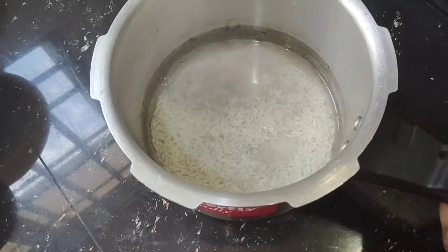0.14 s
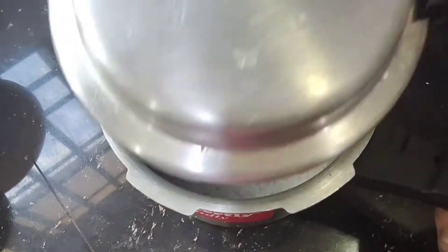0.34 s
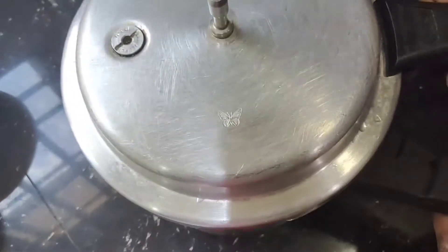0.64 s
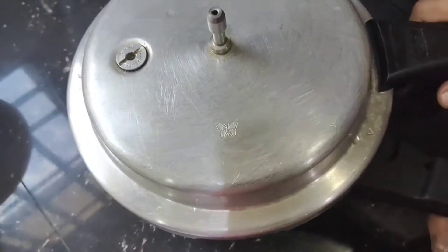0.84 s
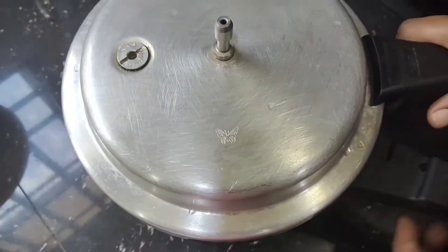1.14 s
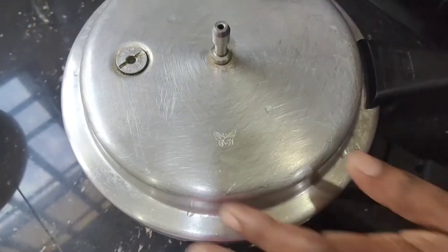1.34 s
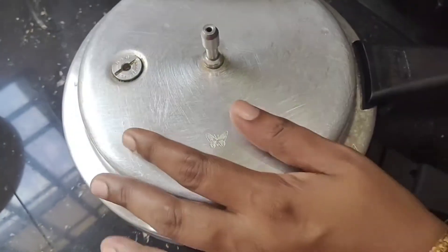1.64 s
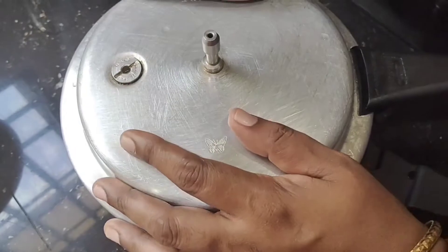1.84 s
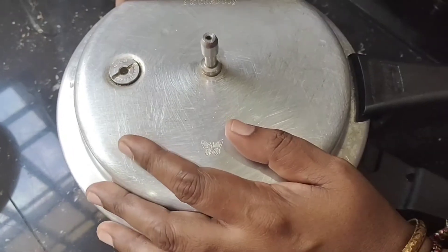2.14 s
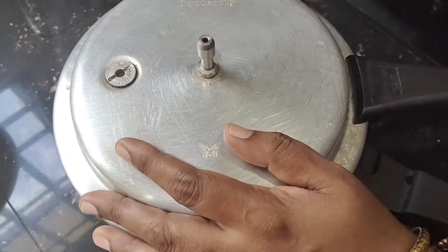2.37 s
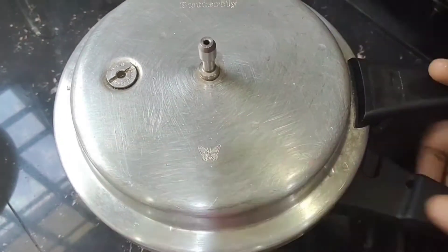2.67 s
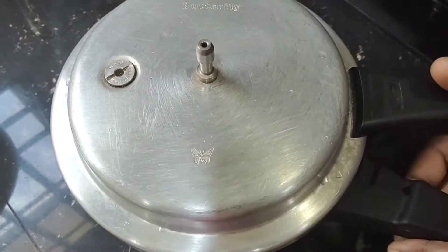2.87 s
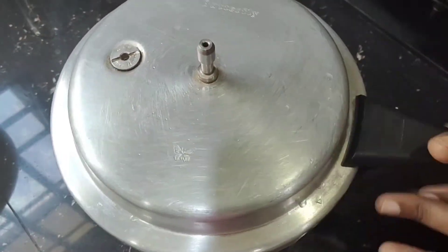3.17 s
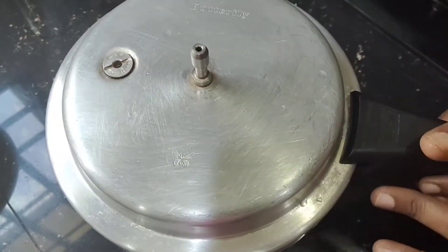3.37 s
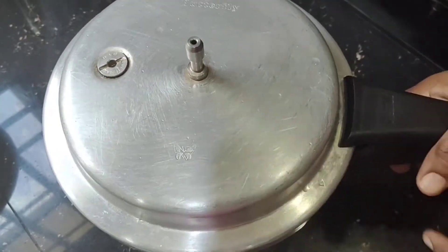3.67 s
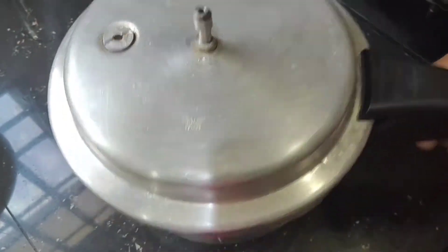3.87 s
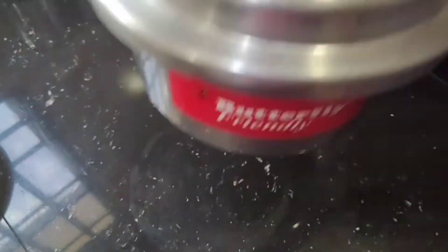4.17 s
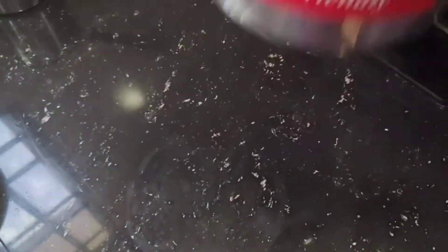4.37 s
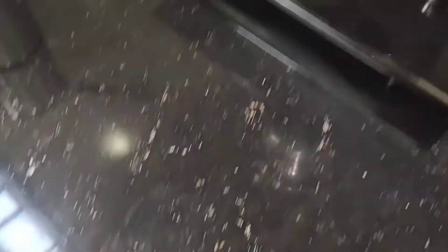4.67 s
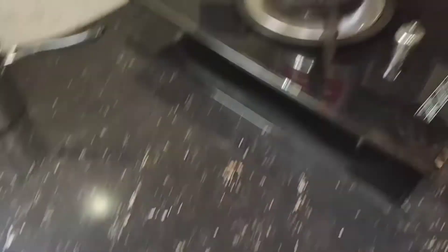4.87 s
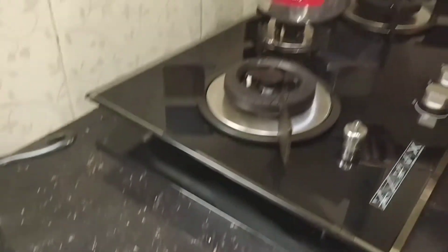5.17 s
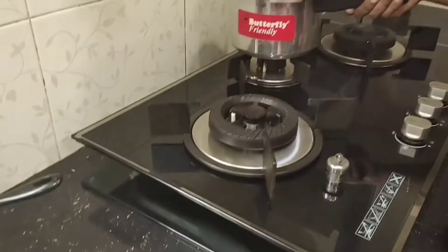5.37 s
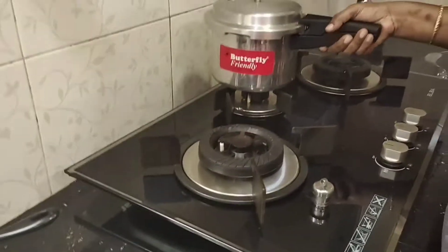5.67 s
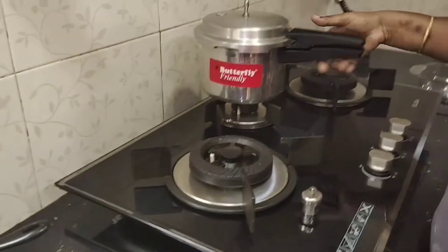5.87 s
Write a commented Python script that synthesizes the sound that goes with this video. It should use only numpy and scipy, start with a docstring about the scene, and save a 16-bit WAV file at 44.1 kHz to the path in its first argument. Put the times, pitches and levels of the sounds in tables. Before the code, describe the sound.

A nearby phone microphone catches a thin metal lid bouncing onto a cooker rim, sliding into its seat, being pushed down and turned until it snaps shut. The loudest clacks come halfway through. Then only faint handling and dry ticks, before the pot scrapes onto the metal grate, which sings briefly, and nudges it once more. Faint fluttering hum, slight hiss and short hard-tiled room reflections.

```python
"""An aluminium pressure cooker on a stone counter: its lid drops on the rim, is pressed home and twisted until
the handles lock, then the pot is lifted and set on a stove trivet. Contacts sum damped modes, noise and a thud;
sliding is grainy noise through the same modes, and a struck grate sings as a narrow band of noise. Behind them a low
hum throbs in the tiled kitchen, over faint sines, thin noise bands and dry ticks. A phone's left microphone port
rings near 2.5 kHz."""
import sys
import numpy as np
from scipy import signal
from scipy.fft import rfft, irfft, next_fast_len
from scipy.io import wavfile
from scipy.ndimage import uniform_filter1d, map_coordinates

SR = 44100
rng = np.random.default_rng(int(sys.argv[2]) if len(sys.argv) > 2 else 0)


def unload_audio(sound):
    """Save the sound as a 16-bit wav file, at the path given as the first command line argument."""
    columns = np.transpose(np.atleast_2d(sound))
    # keep every value between -1 and 1, then stretch to whole-number steps
    steps = np.round(np.clip(columns, -1, 1) * 32767)
    wavfile.write(sys.argv[1], SR, steps.astype(np.int16))


N = 265482  # samples

# Levels in the tables are relative: fixed trims in the functions are added to some of them.
# The throbbing hum. Each row: time in seconds, level in dB.
HUM_LEVEL = [(0, -67), (0.422, -60.5), (.72, -68), (1.5, -59.5), (1.95, -51), (2.33, -59), (2.529, -90),
             (2.798, -62), (3.6, -56.5), (3.96, -53), (4.301, -58), (4.628, -67), (4.73, -58.5),
             (5.02, -65.5), (5.3, -66), (6.02, -60.5)]
# The drone above the hum. Each row: time in seconds, level in dB.
DRONE_LEVEL = [(0, -78), (.6, -69), (1.5, -76.5), (2.9, -70.5), (4, -62), (4.3, -90), (4.85, -68.5),
               (5, -61), (6.02, -60)]
# Spectral shapes of hum, drone and room hiss. Each row: frequency in Hz, relative density in dB.
HUM_COLOUR = [(21, -98), (35, -46.5), (80, -7), (195, -4), (280, -9), (341, -17), (420, -35), (550, -66.5),
              (920, -120)]
DRONE_COLOUR = [(330, -39), (430, -7), (500, 3), (560, -9), (610, 0.5), (700, -8.5), (850, -29.5),
                (1200, -87)]
AIR_COLOUR = [(410, -29), (700, -5.5), (994, -11.5), (1050, -7.5), (1580, -13.5), (1800, -11.5),
              (1950, -15.5), (2660, -16.5), (6270, -22), (15500, -18.5)]
AIR_DB = -76  # room hiss at the top of each throb
THROB_HZ, THROB_START_S, THROB_SCATTER_DB = 10.44, 0.034, 0.5  # scatter is from one throb to the next
# Correlation of left and right in diffuse sound. Each row: frequency in Hz, likeness from 0 to 1.
LIKENESS = [(60, 0.92), (180, 0.97), (550, 0.62), (1650, 0.022), (4970, 0.011), (15000, 0.051)]
# Reverberation of the kitchen. Each row: frequency in Hz, 60 dB decay time in seconds.
KITCHEN_T60 = [(120, 0.66), (500, 0.42), (2000, 0.33), (6000, 0.12), (14000, 0.33)]
# Thin noise bands that swell and fade in the background. Each row: frequency in Hz, width in Hz, median level in dB.
FAINT_BANDS = [(2546, 30, -103.5), (2600, 60, -94)]
# Brief faint sines of wavering level. Each row: start in seconds, length in seconds, frequency in Hz, level in dB.
FAINT_SINES = [(0.0, .12, 3060, -86), (.09, .12, 2700, -86), (.15, .24, 1825, -82), (.22, .09, 2640, -86),
               (.44, .16, 2560, -85), (.5, .14, 1071, -84), (2.42, .08, 2195, -76), (2.5, .05, 2200, -74),
               (2.49, .06, 2460, -74), (2.82, .08, 1650, -78)]
# Dry ticks close to the phone. Each row: start in seconds, level in dB, left-right balance in dB.
TICKS = [(4.869, -49.5, -23.5), (4.9675, -51, -7.5), (5.119, -37.5, -13.5)]
# The singing grate: frequency in Hz, width in Hz, level in dB, 60 dB decay time in seconds.
GRATE = (2530, 35, -43, 0.45)
# The pot strikes the grate. Each row: time in seconds, level in dB.
GRATE_STRIKES = [(5.356, 0), (5.44, -5), (5.507, -5), (5.575, -9)]
# Natural frequencies of the lid's dome and of the rim, in Hz.
DOME_HZ = [1000, 382, 569, 842, 1322, 1453]
RIM_HZ = [2469, 1695, 1798, 1951, 2072, 2209, 2300, 2589, 2715, 2838, 3102]
# The same modes in the same order. Each row: level in dB, free 60 dB decay time in seconds.
DOME_MODES = [(0, 0.087), (-5.5, 0.11), (1.5, 0.055), (0, 0.059), (-1, 0.12), (-5, 0.16)]
RIM_MODES = [(3, 0.065), (-1, 0.06), (-5.5, 0.2), (-9.5, 0.097), (-4, 0.07), (-8, 0.077), (1, 0.11),
             (-14, 0.44), (4, 0.096), (-6.5, 0.073), (-9.5, 0.19)]
# Strokes of metal and hands sliding. Each row: peak time, rise and fall in seconds, then the levels of
# rumble, dome, rim and hiss in dB.
STROKES = [(0.847, 0.059, 0.52, -57.5, -56, -90, -46), (0.961, 0.15, 0.15, -38, -45, -68, -77),
           (1.198, 0.14, 0.063, -45, -50, -49.5, -54), (1.36, 0.19, 0.58, -66.5, -97, -76, -69),
           (1.659, 0.023, 0.85, -87, -83, -66, -56.5), (1.743, 0.062, 0.16, -32.5, -43, -51, -51),
           (1.865, 0.22, 0.25, -50.5, -56.5, -57.5, -61.5), (2.073, 0.042, 0.31, -36.5, -44, -46.5, -41),
           (2.46, 0.08, 0.072, -74, -97, -69.5, -74), (2.514, 0.078, 0.17, -58, -95, -98, -58.5),
           (2.63, 0.047, 0.11, -54.5, -66, -91, -59.5), (2.73, 0.067, 0.14, -54, -67, -67, -67),
           (2.82, 0.059, 0.12, -56.5, -98, -70, -67.5), (2.985, 0.118, 0.78, -49.5, -47.5, -48.5, -51),
           (3.228, 0.017, 0.27, -51, -42.5, -40.5, -58.5), (3.285, 0.15, 0.042, -55.5, -49.5, -35, -45.5),
           (3.331, 0.026, 0.44, -53, -56, -42.5, -52), (3.479, 0.32, 0.29, -56, -74, -60.5, -66.5),
           (3.678, 0.031, 0.27, -87, -97, -58, -56), (3.851, 0.16, 0.35, -74, -51, -52.5, -48),
           (3.942, 0.24, 0.12, -52.5, -68, -56, -74), (4.27, 0.025, 0.46, -69, -91.5, -74, -73),
           (4.402, 0.054, 0.25, -56, -92, -75.5, -58.5), (4.726, 0.021, 0.16, -58.5, -67.5, -71.5, -68),
           (4.764, 0.04, 0.56, -66.5, -72, -68, -69), (4.976, 0.04, 0.11, -79.5, -83, -70, -64),
           (5.081, 0.21, 0.58, -63.5, -66.5, -77, -92), (5.3, 0.3, 0.3, -73, -100, -88, -54.5),
           (5.469, 0.19, 0.5, -36.5, -52, -56.5, -68), (5.576, 0.18, 0.14, -48, -42, -56, -54),
           (5.9, 0.34, 0.5, -61, -57.5, -66, -55.5)]
STROKE_RANGE_DB = 30  # a stroke climbs this much in its rise and loses it in its fall
# Spectral shapes of the strokes. Each row: frequency in Hz, relative density in dB.
RUMBLE_COLOUR = [(29, -67.5), (50, -30), (134, -9), (199, -12.5), (231, 1), (272, -8), (600, -14),
                 (780, -24), (1320, -120)]
HISS_COLOUR = [(1880, -14), (3200, -5.5), (3830, -9), (5150, -14), (9780, -13.5), (13300, -10.5),
               (14400, -7), (15500, -26)]
WANDER_DB, WANDER_RATE = 3, 14  # swell of each set of rubbed rim modes: rms dB, random knots per second
# The pot base grinds onto the trivet. Each row: time in seconds, level in dB.
GRIND_LEVEL = [(5.34, -46), (5.354, -31.5), (5.434, -41.5), (5.444, -46), (5.466, -43), (5.618, -42.5),
               (5.662, -58.5), (5.666, -48), (5.78, -57)]
# Resonances of the stove under the grinding. Each row: frequency in Hz, width in Hz, level in dB.
STOVE = [(272, 330, 4.5), (414.5, 32, -3), (890, 130, -12.5), (1360, 58, -11.5), (1530, 65, -10),
         (1860, 90, -2), (2480, 110, -29.5), (3150, 240, -20), (3690, 150, -32), (4050, 210, -13.5),
         (5200, 150, -27)]
# The pot nudges the trivet. Each row: time in seconds, level in dB.
CLINKS = [(5.857, -37), (5.8625, -25.5), (5.867, -32.5), (5.886, -57)]
# Modes of the trivet. Each row: frequency in Hz, level in dB, free 60 dB decay time in seconds.
TRIVET = [(808, -3.5, 0.15), (400, 9, 0.018), (877, -13.5, 0.11), (1710, 0.5, 0.05), (1820, -31, 0.23),
          (2610, -12, 0.067), (3260, -14, 0.17)]
# Contacts. Each row: time in seconds, ring level in dB, dome and thud levels in dB re ring, thud pitch in Hz.
CONTACTS = [(0.7969, -20.5, 1.5, -4, 412), (0.8355, -29, 1.5, 0.5, 400), (0.9062, -16, -1, 0.5, 345.7),
            (0.9649, -10.5, -16, -25, 357), (1.0324, -11, -5.5, -21, 221), (1.068, -47, -2, 18, 144.7),
            (1.0974, -30.5, -28, -32, 187), (1.1464, -28.5, -19, -7, 146), (1.1798, -36.5, -1.5, 10, 219),
            (1.203, -36, -9, 6.5, 224), (1.229, -38, -10, 8, 216), (1.281, -53.5, -14, 20.5, 219.5),
            (1.3394, -36, -13.5, 13, 172), (1.6992, -41, 5, 4, 216), (1.72, -24, 2, -0.5, 201),
            (1.73, -26, 3.5, 9, 166.6), (1.8594, -34.5, -29, -24, 153), (2.0427, -32, -8, 3.5, 113.4),
            (2.0521, -18.5, 1, -9, 136), (2.618, -50.5, -4, -5, 241), (2.9163, -39, -19, -3.5, 451),
            (2.9569, -23.5, 7, -19, 436), (2.961, -14.5, -11, -43.5, 356), (3.1044, -27, 2.5, -8.5, 225.6),
            (3.163, -29, 7, -15, 245), (3.1703, -17.5, -15, -14.5, 252), (3.1756, -23, 9.5, -10, 150),
            (3.2205, -28.5, 10.5, -8, 315.7), (3.246, -23, -21, -24, 298), (3.2595, -41, -20, -26.5, 302.6),
            (3.2705, -19, -18, -31, 299.5), (3.2775, -24, -17.5, -20, 300.4), (3.2826, -16, -41, -35, 441),
            (3.289, -4.5, -1, -34, 255.3), (3.2922, -17.5, -28, -16, 420), (3.3396, -30, -14, -28, 325),
            (3.3715, -13.5, 11, -23, 333), (3.662, -35.5, -19, -22.5, 302), (3.7573, -28, -5, -38, 310),
            (3.7685, -5.5, -11.5, -56, 311.5), (3.7745, -14, -9.5, -42.5, 403),
            (3.9444, -35.5, 2.5, -2.5, 303), (4.0175, -37.5, -32.5, -8, 300),
            (4.1179, -44, -3, -0.5, 256.4), (4.155, -53, -7.5, 5, 230), (4.3914, -34.5, -2, -9, 217.6),
            (4.4375, -46.5, 1, 4, 246), (4.9484, -52, -6.5, -0.5, 218), (4.9653, -48, 16.5, 0.5, 299),
            (5.3512, -30.5, -11, 2, 447), (5.3582, -29, 2, -0.5, 254), (5.439, -38.5, 8, 11, 332),
            (5.5068, -48, 18, 17.5, 386), (5.529, -52, -9, 17, 312), (5.567, -61, 22, -12, 410),
            (5.5753, -46, 19.5, 19.5, 464), (5.611, -47, -7, 16.5, 338), (5.667, -56.5, 8, 19.5, 325)]
# Stage starts in seconds: the lid touches, bounces, lands, seats, is pressed, is twisted, locks, the handles
# snap, the pot is carried, the pot is set down.
STAGE_S = [0, .88, 1.0, 1.05, 1.6, 2.9, 3.25, 3.7, 3.9, 5.3]
# How the lid is held at each stage. Each row: crash in dB re ring, share of the rim's free ring time, clack in
# dB re ring, clack pitch in Hz, rim side modes in dB, dome side modes in dB, shimmer in dB re ring.
GRIP = [(-18.5, 0.94, -38, 1800, -8, -8, -49), (-20.5, 0.64, -7.5, 1500, -7.5, -3, -29.5),
        (-20.5, 0.33, -5, 2000, -6, -8.5, -28), (-18, 0.13, -9, 2500, 7, 14.5, -14.5),
        (-9, 0.3, 0, 2170, 3.5, -2, -30), (-19, 0.4, 0.5, 2200, -4.5, -6.5, -27.5),
        (-21, 0.26, 0, 2020, 2, -8.5, -24), (-18.5, 0.46, -4, 2480, -5.5, 1.5, -24.5),
        (-19.5, 0.25, -4.5, 2150, -0.5, -6, -23.5), (-28.5, 0.47, 4, 1570, 0, 4, -22.5)]
# Share of the dome's free ring time at each stage.
DOME_SHARE = [1, 0.81, 0.41, 0.16, 0.46, 0.36, 0.12, 0.25, 0.22, 0.31]
# Clusters of thin high modes. Each row: frequency in Hz, width in Hz, level in dB.
SHIMMER = [(4420, 200, 0), (4680, 250, -3), (3770, 150, -3), (5280, 400, -9)]
LOOSE_T60, LOCKED_T60 = 0.12, 0.4  # shimmer decay in seconds, before and after the twist begins
CLACK_CYCLES = 9.3  # a clack dies 60 dB in this many cycles
# The left port's cavity: frequency in Hz, width in Hz, level in dB of the resonance added to the direct sound.
PORT = (2350, 540, 3.62)
# The right port faces away. Each row: frequency in Hz, gain in dB.
SHADE = [(600, 0), (1200, -1.5), (2000, -2.5), (2600, -4), (3400, 0), (6000, -4), (12000, 1)]
# Response of both capsules. Each row: frequency in Hz, gain in dB.
CAPSULE = [(20, -13), (70, -7.5), (110, 0), (2880, -0.5), (3350, -4.5), (4200, 0), (9000, -4), (12000, -12),
           (15500, -17)]
TOP_HZ = 15650  # band limit


def amp(db):
    """Level definition: a gain is ten to the power of dB / 20."""
    return 10 ** (np.asarray(db) / 20)


def unit(x):
    """Normalisation: scales x to rms 1."""
    return x / np.sqrt(np.mean(x ** 2) + 1e-20)


def decay(t, t60):
    """Exponential damping: 60 dB are lost in t60 seconds."""
    return amp(-60 * t / t60)


def onset(t, seconds):
    """Exponential approach: a contact force builds up with this time constant."""
    return 1 - np.exp(-t / seconds)


def sine(hz, t):
    """Simple harmonic motion at hz."""
    return np.sin(2 * np.pi * hz * t)


def along(points, hz):
    """Logarithmic pitch axis: interpolates (Hz, value) points in log frequency."""
    f, v = np.transpose(points)
    return np.interp(np.log(hz + 1), np.log(f + 1), v)


def coloured(points):
    """Spectral shaping: a zero-phase response through (Hz, dB) points."""
    return lambda f: amp(along(points, f))


def level(rows):
    """Envelope: one dB value per sample through (s, dB) rows, -120 dB before the first."""
    s, db = np.transpose(rows)
    return np.interp(np.arange(N) / SR, s, db, left=-120)


def wobble(rate):
    """Band-limited chance: a smooth random curve with rate knots a second."""
    knots = rng.standard_normal(int(N * rate / SR) + 4)
    coarse = np.arange(0, N + 32, 32)
    return np.interp(np.arange(N), coarse, map_coordinates(knots, [coarse * rate / SR]))


def spectrum_hz(x):
    """Fourier analysis: the frequencies of the spectrum of x."""
    return np.fft.rfftfreq(x.shape[-1], 1 / SR)


def filtered(x, response):
    """Linear filtering: the spectrum of x times a response of frequency."""
    m = next_fast_len(N + SR // 2)
    return irfft(rfft(x, m) * response(np.fft.rfftfreq(m, 1 / SR)), m)[..., :N]


def peak(f, hz, width):
    """Damped oscillator: a causal resonance of height 1."""
    return 1j * f * width / (hz * hz - f * f + 1j * f * width)


def resonant(peaks):
    """Modal superposition: (Hz, width, dB) resonances side by side, with alternating sign."""
    def response(f):
        return sum((-1) ** k * amp(db) * peak(f, hz, width) for k, (hz, width, db) in enumerate(peaks))
    return response


def half_angle(hz):
    """Partial coherence: the mixing angle of two independent noises that gives the left-right likeness."""
    return np.arccos(np.clip(along(LIKENESS, hz), -1, 1)) / 2


def rush(response, grain_db, rate):
    """Turbulent excitation: coloured stereo noise of rms 1, its level flickering at rate knots a second."""
    pair = rng.standard_normal((2, N)) * amp(grain_db * wobble(rate))
    mid, side = filtered(pair, lambda hz: response(hz) * [np.cos(half_angle(hz)), np.sin(half_angle(hz))])
    return unit(np.array([mid + side, mid - side]))


def add(out, x, at):
    """Superposition: mixes x into out from sample at."""
    out[:, at:at + x.shape[1]] += x


def kitchen_air():
    """Amplitude modulation: hum and drone throb about ten times a second over faint, slightly throbbing hiss."""
    beats = (np.arange(N) / SR - THROB_START_S) * THROB_HZ
    which = np.floor(beats).astype(int)
    s, db = np.transpose(HUM_LEVEL)
    strength_db = np.interp(THROB_START_S + which / THROB_HZ, s, db)
    strength_db += THROB_SCATTER_DB * rng.standard_normal(which[-1] + 2)[which]
    sag_db = uniform_filter1d(-16 * (beats % 1) ** 3.5, size=300)  # sudden rise, sagging end
    hum_db = uniform_filter1d(strength_db, size=400) + sag_db
    hum = amp(hum_db) * rush(coloured(HUM_COLOUR), grain_db=1.0, rate=66)
    drone_db = level(DRONE_LEVEL) + 0.8 * sag_db
    drone = amp(drone_db) * rush(coloured(DRONE_COLOUR), grain_db=1.5, rate=30)
    air = amp(AIR_DB + 0.3 * sag_db) * rush(coloured(AIR_COLOUR), grain_db=1, rate=9)
    return hum + drone + air


def faint_bands_and_sines():
    """Narrow-band noise and amplitude modulation: thin bands swell and fade, with brief sines of wavering level."""
    out = np.zeros((2, N))
    for hz, width, db in FAINT_BANDS:
        out += amp(db + 7 * wobble(9)) * rush(resonant([(hz, width, 0)]), grain_db=0, rate=1)
    waver = amp(3 * wobble(40))
    for s, length, hz, db in FAINT_SINES:
        t = np.arange(round(length * SR)) / SR
        at = round(s * SR)
        swell = np.sin(np.pi * t / length)
        add(out, amp(db) * swell * sine(hz, t) * waver[at:][None, :len(t)], at)
    return out


def ticks():
    """Heavily damped impulses: a snap, a thin noise edge and a low knock, too short to ring."""
    out, t = np.zeros((2, N)), np.arange(SR // 50) / SR
    for s, db, balance_db in TICKS:
        snap = amp(20) * sine(1800, t) * decay(t, 0.002) * onset(t, 0.0004) ** 2
        edge = amp(-12) * rng.standard_normal(len(t)) * decay(t, 0.0037)
        knock = amp(-9) * sine(650, t) * decay(t, 0.016)
        sides = amp([[balance_db / 2 - 28.5], [-balance_db / 2]])  # the left is far weaker
        add(out, amp(db) * (snap + edge + knock) * sides, round(s * SR))
    return out


def grate():
    """Beating: a narrow noise band, fluctuating as close modes do, dies away after each strike."""
    hz, width, db, t60 = GRATE
    strike_s, strike_db = np.transpose(GRATE_STRIKES)
    late = np.arange(N) / SR - strike_s[:, None]
    fade = amp(strike_db) @ ((late > 0) * decay(np.abs(late), t60))
    song = filtered(rng.standard_normal(N), lambda f: peak(f, hz, width) ** 2)
    return amp(db) * fade * unit(song)


def modes(hz, rows):
    """Modal description: joins frequencies with their (dB, t60) rows."""
    return np.column_stack([hz, rows])


def rubbed(rows, width):
    """Added damping: the modes as resonances widened to width Hz, smeared by the hands."""
    return resonant([(hz, width, 0.96 * db) for hz, db, t60 in rows])


def sliding():
    """Dry friction: grainy rubbing excites the modes of dome and rim, with rumble and hiss."""
    s, rise, fall, *layers_db = np.transpose(STROKES)[:, :, None]
    steps = np.arange(0, N + 16, 16)
    late = steps / SR - s
    shape = amp(-STROKE_RANGE_DB * np.maximum(late / fall, -late / rise))
    layers = amp(layers_db)[:, :, 0] @ shape
    rumble, dome, rim, hiss = [np.interp(np.arange(N), steps, v) for v in layers]
    out = rumble * rush(coloured(RUMBLE_COLOUR), grain_db=2, rate=30)
    out += dome * rush(rubbed(modes(DOME_HZ, DOME_MODES), 80), grain_db=2, rate=80)
    for first in (0, 1):  # the rubbing point moves, so two sets of rim modes swell independently
        part = rush(rubbed(modes(RIM_HZ, RIM_MODES)[first::2], 40), grain_db=5, rate=350)
        out += rim * amp(WANDER_DB * wobble(WANDER_RATE) - 4) * part
    return out + hiss * rush(coloured(HISS_COLOUR), grain_db=2, rate=150)


def grinding():
    """Stick-slip: the pot base grinds on the trivet as flickering noise through the stove's resonances."""
    until_end = np.arange(N) < GRIND_LEVEL[-1][0] * SR
    return amp(level(GRIND_LEVEL) - 1.5) * until_end * rush(resonant(STOVE), grain_db=5, rate=60)


def tails(count):
    """Diffuse reverberation: count stereo noise responses, each frequency dying at its own speed."""
    hz, t, z = signal.stft(rng.standard_normal((count, 2, SR // 2)), SR, nperseg=256)
    tail = signal.istft(z * decay(t, along(KITCHEN_T60, hz)[:, None]), SR, nperseg=256)[1]
    turn = half_angle(spectrum_hz(tail))
    a, b = np.moveaxis(rfft(tail), 1, 0)
    mid, side = np.cos(turn) * a, np.sin(turn) * b
    tail = irfft(np.stack([mid + side, mid - side], axis=1))[..., :SR // 2 - 500]
    return tail / np.linalg.norm(tail[0, 0])


def place(out, x, s, room):
    """Convolution: adds a stereo sound at time s and the kitchen's response to its left channel."""
    at = round(s * SR)
    add(out, x, at)
    add(out, amp(-6.0) * signal.fftconvolve(x[:1], room, axes=1), at + 150)  # 3.4 ms later


def ring(rows, t, share, side_db, luck):
    """Modal decay: damped sines at random strengths; the grip shortens all and sets all but the first's level."""
    hz, db, t60 = np.transpose(rows)[:, :, None]
    rest, t = len(t) - SR // 7, t[:SR // 7]  # silent after this
    strength, turn = luck[:, :len(rows), None]
    fade = amp(db + 2.5 * strength + side_db * (hz != hz[0])) * decay(t, t60 * share)
    apart = 2.5 * turn * hz / 2000  # high modes beam unevenly and reach the ports out of step
    sides = [np.sum(fade * np.sin(2 * np.pi * hz * t + lag), axis=0) for lag in (0, apart)]
    return np.pad(sides, [(0, 0), (0, rest)])


def trivet_clinks():
    """Impact excitation: the pot nudges the trivet and its modes ring."""
    out, t = np.zeros((2, N + 2 * SR)), np.arange(SR // 25 * 6) / SR
    rooms = tails(count=len(CLINKS))
    for room, (s, db) in zip(rooms, CLINKS):
        clink = ring(TRIVET, t, 0.56, 0, rng.standard_normal((2, 12))) * onset(t, 0.00067)
        place(out, amp(db - 6.5) * clink, s, room)
    return out[:, :N]


def cooker_contacts():
    """Impact excitation: contacts clack, crash, ring rim and dome, and thump the air shut in the pot."""
    out, t = np.zeros((2, N + 2 * SR)), np.arange(SR // 25 * 6) / SR
    luck = rng.standard_normal((len(CONTACTS), 2, 2, 12))
    noise = rfft(rng.standard_normal((len(CONTACTS), 2, 2, len(t))))
    f = spectrum_hz(t)
    # countless high modes, heard as noise
    crashes = unit(irfft(noise[:, 0] * peak(f, 2800, 6800) * peak(f, 5500, 16000)))
    shimmers = unit(irfft(noise[:, 1] * resonant(SHIMMER)(f)))
    rooms = tails(count=12)  # used in rotation
    for k, (s, db, dome_db, thud_db, thud_hz) in enumerate(CONTACTS):
        stage = np.searchsorted(STAGE_S, s) - 1
        crash_db, rim_share, clack_db, clack_hz, rim_side_db, dome_side_db, shimmer_db = GRIP[stage]
        shimmer_t60 = LOCKED_T60 if s > STAGE_S[5] else LOOSE_T60
        clack = amp(6.5) * sine(clack_hz, t) * decay(t, CLACK_CYCLES / clack_hz) * onset(t, 0.00068)
        crash = crashes[k] * (decay(t, 0.019) + decay(t, 0.075)) * onset(t, 0.0013)
        thud = sine(thud_hz, t) * decay(t, 0.053) * onset(t, 0.0009)
        rim = ring(modes(RIM_HZ, RIM_MODES), t, rim_share, rim_side_db, luck[k, 0])
        dome = ring(modes(DOME_HZ, DOME_MODES), t, DOME_SHARE[stage], dome_side_db, luck[k, 1])
        shimmer = shimmers[k] * decay(t, shimmer_t60)
        body = amp(-9.5) * rim + amp(dome_db - 5.5) * dome + amp(shimmer_db - 8.5) * shimmer
        body = body + amp(crash_db - 2.0) * crash + amp(thud_db + 1.5) * thud
        contact = onset(t, 0.0013) * body + amp(clack_db) * clack
        place(out, amp(db) * contact, s, rooms[k % len(rooms)])
    return out[:, :N]


def scene():
    """Superposition: the background, the ticks, the stove and the cooker."""
    background = kitchen_air() + faint_bands_and_sines() + ticks()
    return background + grate() + sliding() + grinding() + trivet_clinks() + cooker_contacts()


def record(dry):
    """Cavity resonance and shading: the left port lifts its band, the right is shaded, both are band-limited."""
    hz, width, db = PORT

    def response(f):
        left = 1 + amp(db) * peak(f, hz, width)
        right = amp(along(SHADE, f))
        return np.array([left, right]) * amp(along(CAPSULE, f)) * (f < TOP_HZ)
    return filtered(dry, response)


dry = scene()
out = record(dry)
unload_audio(out)
```